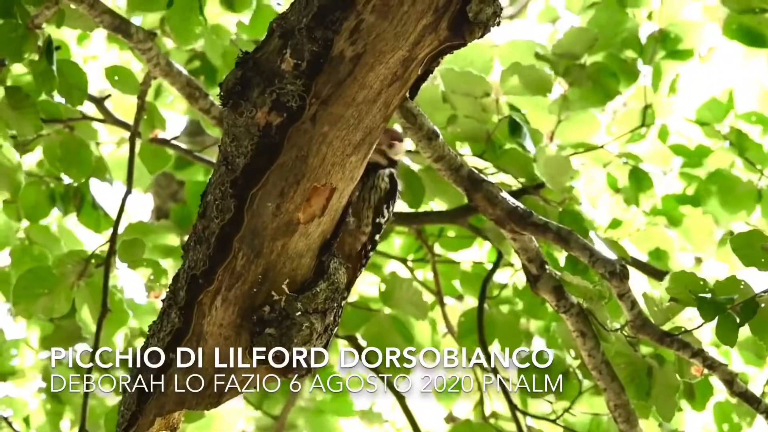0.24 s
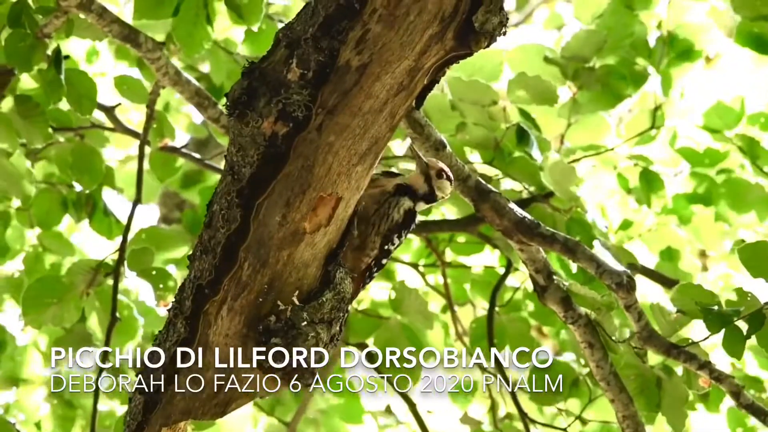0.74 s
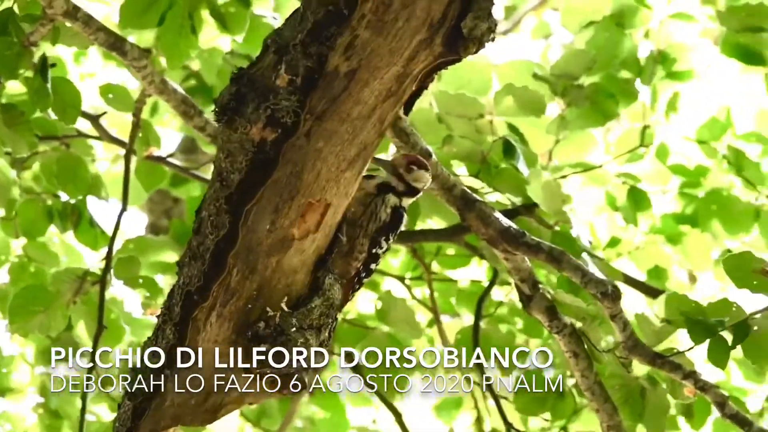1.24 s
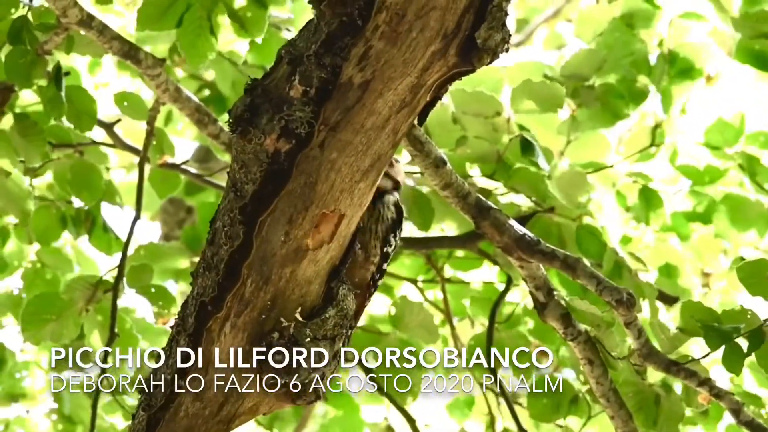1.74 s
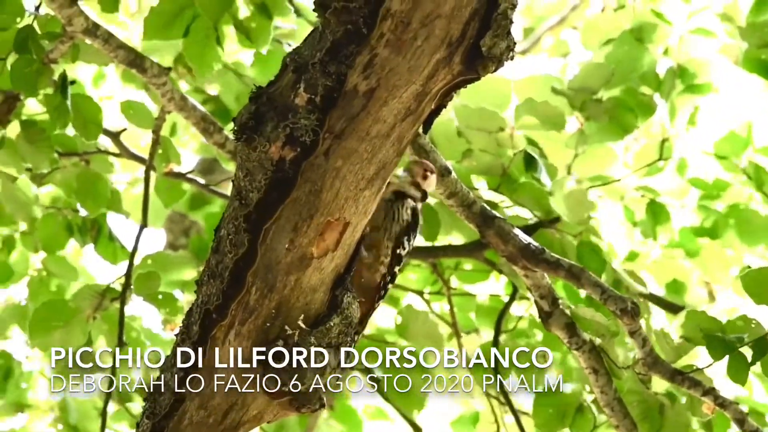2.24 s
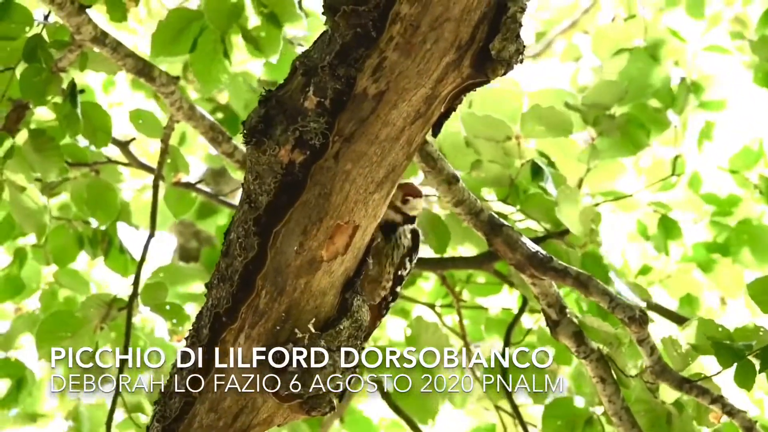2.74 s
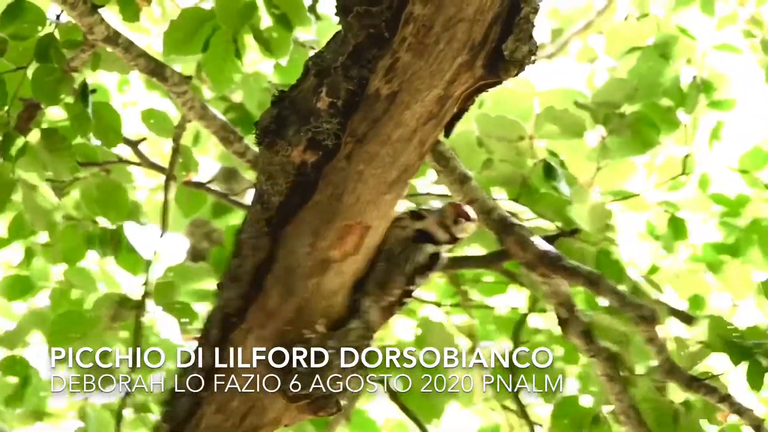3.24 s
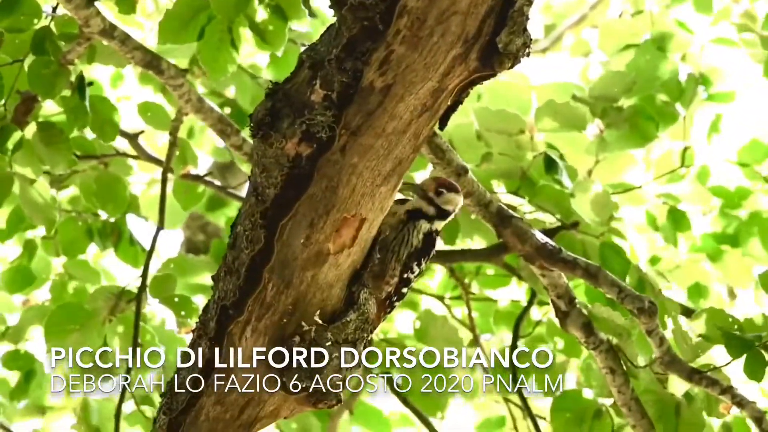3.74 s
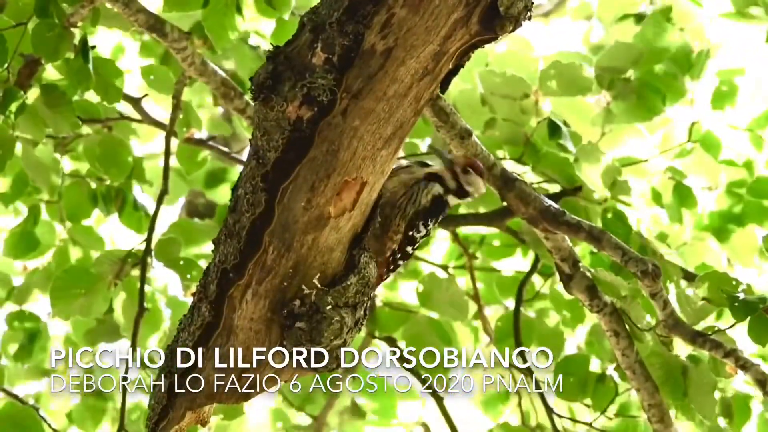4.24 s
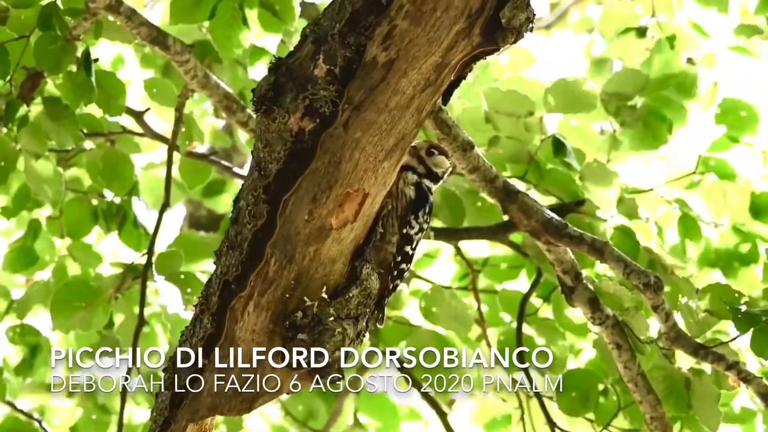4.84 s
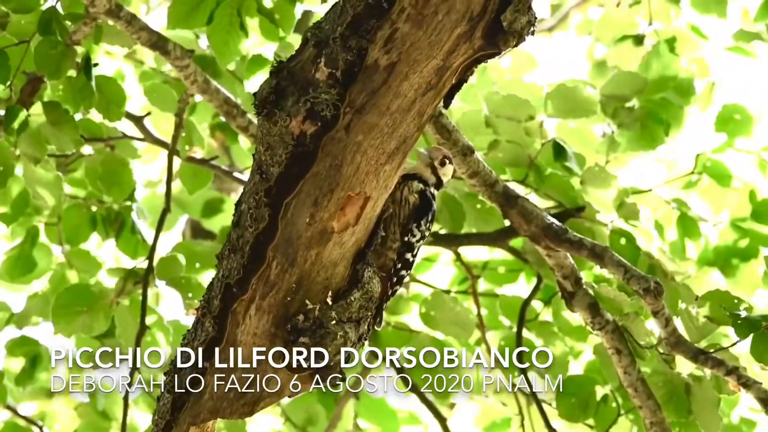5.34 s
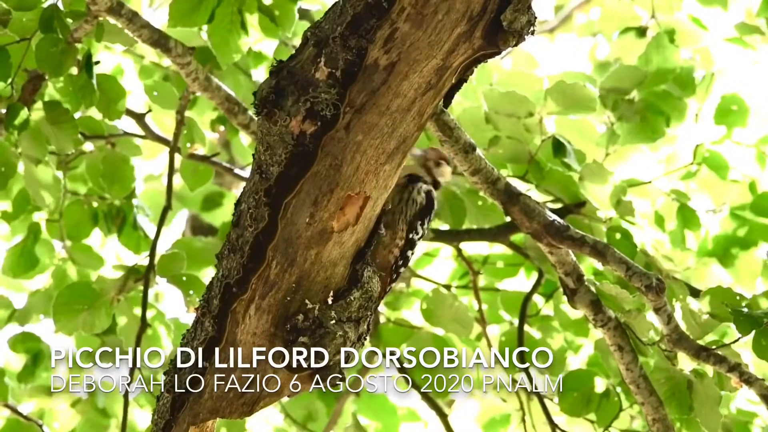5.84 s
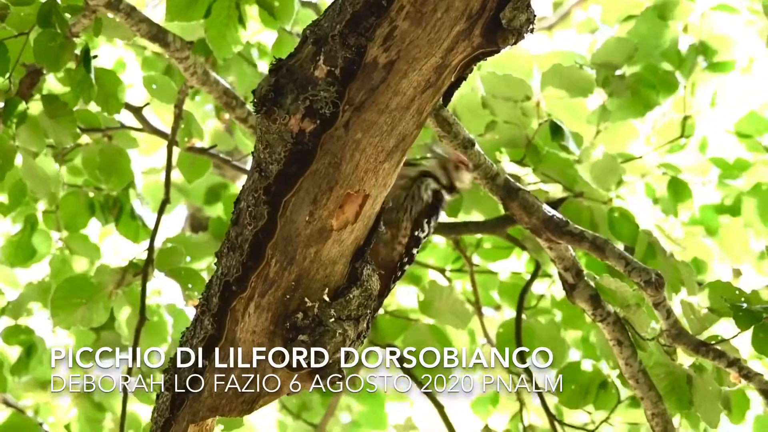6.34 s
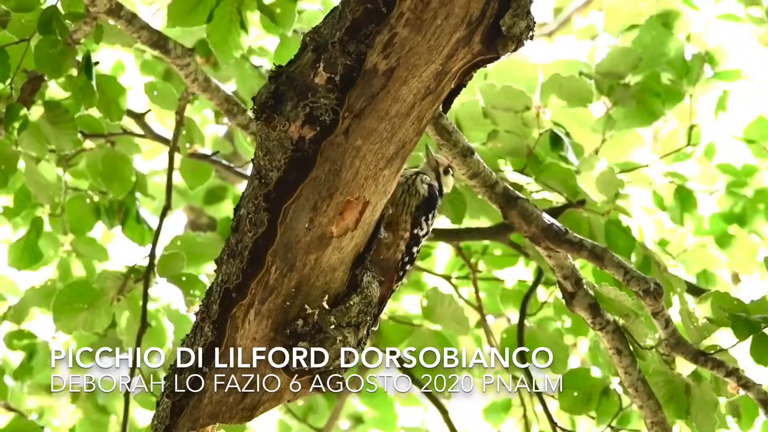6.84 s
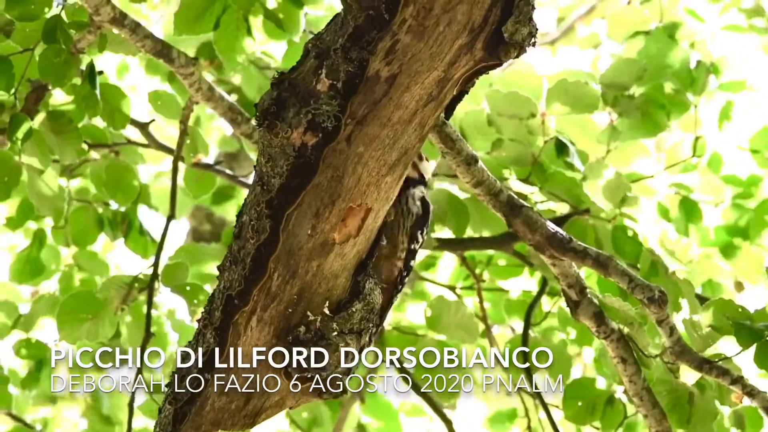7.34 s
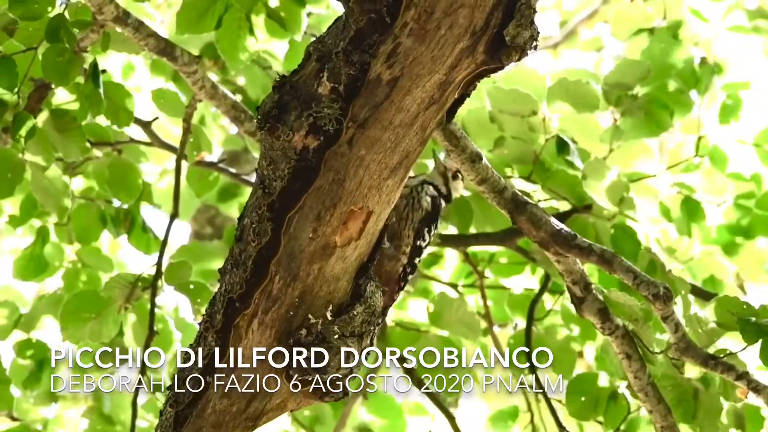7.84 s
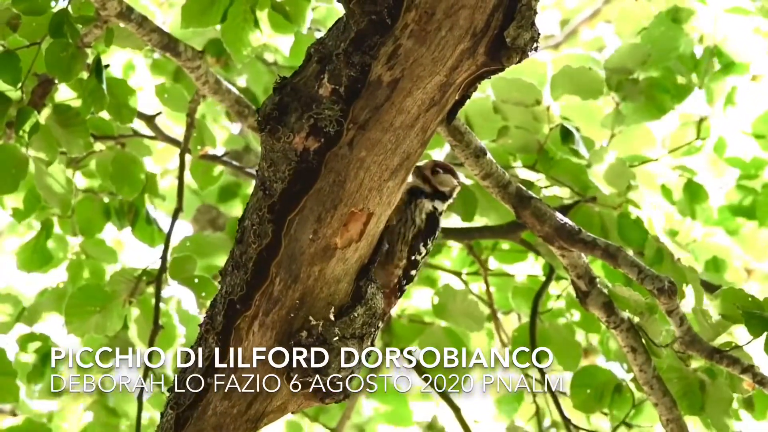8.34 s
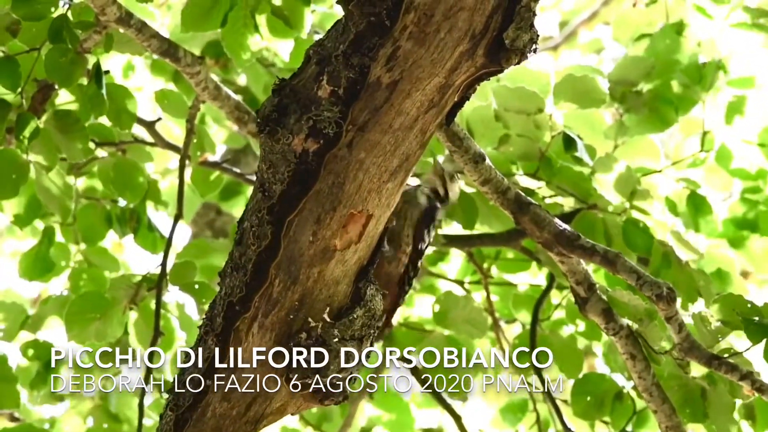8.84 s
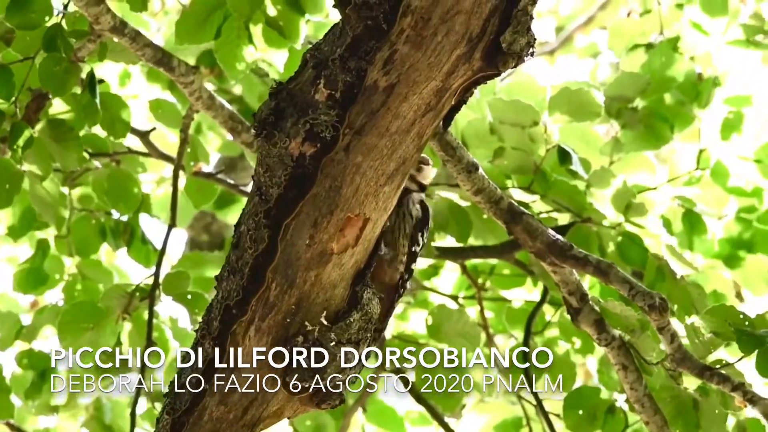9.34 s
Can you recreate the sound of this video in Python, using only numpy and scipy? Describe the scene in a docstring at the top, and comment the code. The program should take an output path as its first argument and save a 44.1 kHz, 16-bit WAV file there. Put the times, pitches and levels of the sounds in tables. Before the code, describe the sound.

A woodpecker pecks irregularly at dry wood among hushed leaves while nearby birds chip, low wind thumps the microphone and sharp camera-casing snaps jump out early.

```python
"""Woodpecker in a leafy wood, hand-held

A woodpecker taps a dead limb: each blow excites the resonances of core, wood and bark. A small bird
chips nearby in two gliding voices and another sings far off in slurred sines, both echoed by the trunks.
Close to the right microphone port the camera's plastic casing snaps in shell rings, amid soft gritty
filtered noise; a light breeze buffets each port in pressure dips, over leaf hush and hiss of shaped noise."""
import sys
import numpy as np
from scipy import signal
from scipy.fft import rfft, irfft, next_fast_len
from scipy.io import wavfile
from scipy.ndimage import uniform_filter1d, map_coordinates

SR = 44100
rng = np.random.default_rng(int(sys.argv[2]) if len(sys.argv) > 2 else 0)


def inscribe(sig):
    """Save sig as 16-bit PCM at rate SR to the path in sys.argv[1].

    A 1-D sig is mono; a 2-D sig holds one channel per row.
    Samples are clipped to [-1, 1] before scaling.
    """
    pcm = np.round(np.clip(np.atleast_2d(sig).T, -1, 1) * 32767)
    wavfile.write(sys.argv[1], SR, pcm.astype(np.int16))


N = 423360  # samples, 9.6 s
TOP_HZ = 15750  # band limit of the microphones' sound

# Noise of the microphones. Each row: frequency in Hz, relative density in dB per Hz.
HISS_SPECTRUM = [(200, -9), (8000, -7), (11000, 0.5), (16000, -1)]
# Far leaves and a faint low drone. Each row: frequency in Hz, relative density in dB per Hz.
LEAF_SPECTRUM = [(88, -60), (150, -4.5), (195, -3), (232, -0.5), (280, -4.5), (1340, -11.5), (2140, -13),
                 (3830, -17.5), (6220, -16.5), (7200, -20), (9360, -58.5), (15800, -120)]
LEAF_DB = -61.5
# Likeness of the leaves at the two ports. Each row: frequency in Hz, correlation from 0 to 1.
PORT_LIKENESS = [(150, 0.6), (400, 0.43), (1200, 0.062), (5000, .02)]

# Breeze at each port. Each row: time in seconds, left level in dB, right level in dB.
BREEZE_LEVELS = [(0, -53.5, -50.5), (0.9, -64.5, -44.5), (1.35, -47.5, -47), (1.8, -59, -48.5),
                 (2.3, -67, -57), (2.9, -63.5, -46), (3.65, -55, -58.5), (4.0, -60.5, -48.5),
                 (4.55, -62, -61), (5.0, -58, -50.5), (5.6, -48, -65), (6.15, -61, -62),
                 (6.7, -55.5, -63.5), (7.3, -49, -67.5), (7.9, -56, -66), (8.5, -52.5, -62),
                 (9.05, -60.5, -60), (9.6, -59, -64)]
# Strongest single eddies. Each row: time in seconds, depth of the dip left in dB, right in dB.
STRONG_EDDIES = [(0.163, -57, -36), (0.256, -61, -35), (0.379, -56, -41), (0.531, -63, -40),
                 (0.73, -62, -42), (0.8, -64, -41), (1.116, -60, -33), (1.234, -40, -45), (1.265, -51, -42),
                 (1.327, -38, -51), (1.359, -45.5, -36), (1.703, -47, -33), (2.495, -63, -37.5),
                 (2.715, -59, -30.5), (2.764, -53, -36), (3.127, -53, -36), (3.257, -60, -37),
                 (3.72, -39, -64), (3.878, -57.5, -37.5), (4.082, -62, -38.5), (4.81, -56, -38),
                 (5.088, -58, -34.5), (5.128, -61, -31), (5.204, -67, -42), (5.511, -35, -58),
                 (5.622, -37, -55.5), (5.783, -36.5, -64), (5.905, -61, -36.5), (6.22, -62, -44),
                 (6.293, -40, -53), (7.201, -33.5, -59), (7.356, -35.5, -53), (7.514, -39.5, -56.5),
                 (8.44, -52, -40), (8.466, -41, -53), (8.683, -40, -64), (9.133, -61, -32.5),
                 (9.437, -54, -40)]
# Eddies at a port. Each row: frequency in Hz, relative density in dB per Hz.
EDDY_SPECTRUM = [(12, -33), (25, -9.5), (45, 1.5), (75, 1), (110, -2.5), (160, -11), (260, -25),
                 (500, -56.5), (1000, -120)]
# Far low roar. Each row: frequency in Hz, relative density in dB per Hz.
ROAR_SPECTRUM = [(12, -22.5), (30, 0.5), (60, -1), (120, -17), (250, -18)]
EDDIES_PER_S, EDDY_SCATTER_DB = 70, 4
LULL_DB, LULL_POINTS_PER_S = 3, 12  # size and pace of the flow's stalls and returns

# Echoes among the trunks. Each row: frequency in Hz, time to die by 60 dB in seconds.
TRUNK_DECAY = [(300, .35), (1500, 0.29), (5000, 0.63), (9000, 0.34)]
# Far song. Each row: start in seconds, length in seconds, start pitch in Hz, end pitch in Hz, level in dB.
SONG_NOTES = [(0.342, 0.046, 7200, 6280, -72), (0.445, .012, 5700, 6500, -64.5),
              (.459, 0.012, 6400, 5500, -64), (0.503, 0.013, 4780, 5900, -64),
              (0.517, .015, 6300, 5450, -64.5), (0.568, 0.012, 5000, 5800, -68),
              (0.581, 0.012, 6300, 5450, -66), (.84, 0.11, 6550, 6450, -75), (0.992, 0.06, 6770, 6400, -73),
              (1.5, .04, 6600, 6400, -75), (1.545, 0.05, 6450, 6380, -77), (2.421, 0.034, 6310, 6370, -75),
              (2.769, .014, 6400, 5560, -63), (2.813, 0.014, 4950, 6100, -69),
              (2.828, .015, 6350, 5400, -64.5), (2.849, 0.014, 7090, 6590, -66),
              (2.896, 0.015, 6200, 5200, -63), (4.065, 0.11, 4490, 4760, -78),
              (4.437, .03, 6900, 6550, -63), (5.47, 0.023, 6400, 6100, -66.5),
              (5.858, 0.017, 7200, 6300, -63), (5.894, 0.054, 6440, 6310, -70),
              (7.282, 0.167, 6580, 6400, -75.5), (7.547, 0.0194, 7100, 6430, -64.5),
              (7.682, 0.055, 6240, 6120, -65), (7.765, 0.093, 6380, 6640, -71.5),
              (8.103, 0.088, 6420, 6230, -69.5), (8.22, 0.07, 6380, 6080, -73.5),
              (8.45, 0.076, 6380, 6350, -69), (8.582, 0.054, 6730, 6470, -70),
              (8.902, 0.0197, 7160, 6600, -63.5), (9.077, 0.089, 6340, 6130, -71)]

# Soft gritty noise on the casing; at 1.039 and 2.704 a faint rustle around the snaps. Each row: start
# in seconds, loudest moment in seconds, end in seconds, hum level in dB, scratch against the hum in dB.
GRITTY_SWELLS = [(.38, 0.49, 0.86, -61.5, -9), (0.89, 0.922, 1.09, -60, -0.5),
                 (1.039, 1.051, 1.18, -49, -7), (1.648, 1.717, 1.72, -56.5, -5),
                 (1.83, 1.867, 1.97, -58, -5), (1.94, 1.975, 2.24, -56.5, -6),
                 (2.558, 2.6, 2.69, -51.5, -10), (2.704, 2.721, 2.95, -51, -5.5),
                 (2.977, 3.077, 3.24, -45.5, -10.5), (3.9, 3.94, 4.7, -67, 1)]
# Hum of the gritty noise, passed twice. Each row: centre in Hz, width in Hz, gain per pass in dB.
GRIT_HUM = [(2070, 450, 0.5), (3060, 2800, -9.5)]
# Scratch of the gritty noise, passed twice. Each row: centre in Hz, width in Hz, gain per pass in dB.
GRIT_SCRATCH = [(4170, 6000, -5), (6300, 1500, 1)]

# Casing snaps. Each row: start in seconds, ring level in dB, ring pitch in Hz, then against the ring
# the bright, dull, fizz and thud levels in dB, and last the burst's time to die by 60 dB in seconds.
CASING_SNAPS = [(1.0523, -22.5, 2140, 9, -49, -20, -23, 0.0074),
                (1.0671, -4.5, 2035, -3.5, -59, -40, -36, 0.0029),
                (1.9862, -27, 2150, 8, -22, -35, -32, 0.014),
                (1.9961, -6.5, 2113, 2, -40.5, -56, -28.5, 0.01),
                (2.7415, -21, 2090, 11.5, -28.5, -4, -24, 0.0078),
                (2.7483, -5.5, 2116, 9, -35.5, -15, -31, 0.0061),
                (3.0958, -15.5, 2130, 2.4, -37, -25.5, -16.5, 0.012),
                (3.1011, -3, 2063, 3, -27, -16.5, -31, 0.0073),
                (3.9007, -39, 2070, -9, -40.5, -24, -7, 0.0043),
                (3.9118, -19.5, 2050, -8.5, -28, -24, -15.5, 0.0074),
                (3.9533, -17, 1960, -8.5, -7.5, -26, -28, 0.0077)]
# Bright seam. Each row: centre in Hz, width in Hz, gain in dB.
SEAM_MODES = [(2570, 1200, 2), (4180, 2300, 2.5), (5920, 1620, 2.5)]
# Dull grip, passed twice. Each row: centre in Hz, width in Hz, gain per pass in dB.
GRIP_MODES = [(1164, 260, 0)]
# Fizz of the casing, passed twice. Each row: centre in Hz, width in Hz, gain per pass in dB.
FIZZ_MODES = [(7960, 900, 0), (11370, 1800, 0.0049)]
# Camera body, passed twice. Each row: centre in Hz, width in Hz, gain per pass in dB.
BODY_MODES = [(232, 160, -1), (620, 390, -2)]
# Casing sound at the farther, left port. Each row: frequency in Hz, gain in dB.
LEFT_PORT_SHADOW = [(250, -8), (1000, -11), (2100, -23), (3000, -20.5), (4700, -11.5), (6500, -17.5),
                    (10000, -4)]

# Chip calls. Each row: start in seconds, call level in dB, extra level of the falling voice in dB.
CHIP_CALLS = [(4.262, -38, -2), (4.4261, -38, -2), (4.5598, -34.5, -5.5), (4.7528, -36, -3.5),
              (4.8651, -38.5, -3), (5.0267, -35, -10), (5.3152, -40, -2), (8.3637, -36, -9),
              (8.6566, -38, -2.5), (9.2317, -37.5, -2.5), (9.4169, -36, -5.5)]
# Rising voice before each call's pitch shift. Each row: seconds after start, pitch in Hz, level in dB.
RISING_VOICE = [(0, 4395, -27), (.003, 4605, -16), (.008, 5106, -1.5), (.013, 5400, -8), (.018, 5530, -39)]
# Falling voice before each call's pitch shift. Each row: seconds after start, pitch in Hz, level in dB.
FALLING_VOICE = [(.002, 7220, -40), (.004, 6620, -7), (.007, 5948, -17), (.011, 5283, -0.5),
                 (.015, 4870, -2), (.02, 4200, -9), (.026, 3570, -11.5), (.029, 3200, -45)]

# Beak blows. Each row: start in seconds, level of the wood in dB, hollow thump and bark crack
# against the wood in dB.
BEAK_BLOWS = [(0.069, -33.5, -5, -14.5), (0.397, -34.5, -10, -4), (1.674, -39, -0.5, -6.5),
              (2.103, -33.5, -14, -6.5), (2.541, -46.5, -24.5, -3), (2.716, -37, -6, -2.5),
              (2.923, -42, -5.5, -10.5), (4.335, -50, -23, -5.5), (4.534, -51.5, 0, -11.5),
              (4.705, -53, -9, -7.5), (5.719, -40.5, -2, 0), (5.979, -39, -10, -7.5),
              (6.216, -45.5, -8, -10), (6.451, -50.5, -2.5, -4), (6.945, -36, -2.5, -2),
              (7.244, -29.5, -16, -8.5), (7.695, -39, -3.5, -4.5), (7.922, -50.5, -28, -9.5),
              (8.639, -38.5, -4, -1.5), (8.885, -34.5, -7, -9.5), (8.966, -54.5, -16, -14),
              (9.231, -40.5, -31, -4), (9.501, -47, -17, -11.5)]
# Hollow core of the limb. Each row: centre in Hz, width in Hz, gain in dB.
CORE_MODES = [(240, 120, -2), (306, 80, -0.5), (454, 46, 5.5), (638, 110, -5.5)]
# Wood of the limb. Each row: centre in Hz, width in Hz, gain in dB.
WOOD_MODES = [(848, 210, -0.5), (1157, 130, 4.5), (1447, 170, 2), (1720, 240, -2), (2060, 230, -3.5),
              (2592, 410, -7)]
# Bark of the limb. Each row: centre in Hz, width in Hz, gain in dB.
BARK_MODES = [(2600, 1100, -4), (4000, 1800, -4), (5800, 2500, -4)]
CRUNCH_T60_S = .031  # crushed fibres die away


def amp(db):
    """dB to gain."""
    return 10 ** (np.asarray(db) / 20)


def unit(x):
    """Each row at rms 1."""
    return x / np.sqrt(np.mean(x ** 2, axis=-1, keepdims=True) + 1e-20)


def noise(*shape):
    """White noise, or single normal draws."""
    return rng.standard_normal(shape)


def along(points, hz):
    """Values between (Hz, value) points on a log axis."""
    f, v = np.transpose(points)
    return np.interp(np.log(hz + 1), np.log(f + 1), v)


def filtered(x, response):
    """x times a complex response of frequency."""
    m = next_fast_len(N + SR // 2)
    return irfft(rfft(x, m) * response(np.fft.rfftfreq(m, 1 / SR)), m)[..., :N]


def add(track, s, sound):
    """Mix a sound into a track at time s."""
    part = track[..., round(s * SR):][..., :sound.shape[-1]]
    part += sound[..., :part.shape[-1]]


def resonant(hz, modes):
    """Causal response of (Hz, width, dB) resonances, alternating in sign."""
    total = 0
    for k, (centre, width, db) in enumerate(modes):
        damping = 1j * hz * width
        total = total + (-1) ** k * amp(db) * damping / (centre ** 2 - hz ** 2 + damping)
    return total


def struck(force, response):
    """A short force through a body's response, scaled to peak 1 and faded out."""
    sound = irfft(rfft(force) * response, len(force))[:len(force) // 2]
    fade = np.hanning(len(force))[len(sound):]
    return sound * fade / np.max(np.abs(sound))


def whistle(points):
    """A sine that follows (s, Hz, dB) points."""
    s, hz, db = np.transpose(points)
    t = np.arange(int(s[-1] * SR)) / SR
    phase = 2 * np.pi * np.cumsum(np.interp(t, s, hz)) / SR
    return amp(np.interp(t, s, db)) * np.sin(phase)


def arriving(x, left_db, lag_s):
    """A source to the right reaches the left port later, at left_db (a number or a curve per Hz)."""
    def ports(hz):
        level_db = left_db(hz) if callable(left_db) else left_db
        return [amp(level_db) * np.exp(-2j * np.pi * hz * lag_s), 1 + 0 * hz]
    return filtered(x, ports)


def among_trunks(sound, wet_db, gap_s):
    """A fresh stereo echo tail for one short sound, each frequency dying at its own speed."""
    hz, t, z = signal.stft(noise(2, SR // 2), SR, nperseg=256)
    trunks_db = 1.5 * noise(len(t))  # single trunks answer louder than the gaps
    decay_db = -60 * t / along(TRUNK_DECAY, hz)[:, None]
    tail = signal.istft(z * amp(trunks_db + decay_db), SR, nperseg=256)[1]
    tail *= 1 - np.exp(-np.arange(tail.shape[1]) / SR / gap_s)  # the nearest trunks answer late
    return amp(wet_db) * signal.fftconvolve(sound[None], tail / np.linalg.norm(tail[0]), axes=1)


def hiss():
    """The microphones' own noise: shaped white noise, separate at each port."""
    return amp(-72) * unit(filtered(noise(2, N), lambda hz: amp(along(HISS_SPECTRUM, hz))))


def hush():
    """Steady rustle of far leaves, faintly patchy, more alike at both ports in the bass."""
    z = signal.stft(noise(2, N), nperseg=512)[2]
    patches = uniform_filter1d(noise(*z.shape[1:]), size=8, axis=0)  # over frequency
    patches = uniform_filter1d(patches, size=20, axis=1)  # over time
    pair = signal.istft(z * amp(0.8 * patches / patches.std()), nperseg=512)[1][:, :N]

    def mid_side(hz):
        # the angle that mixes mid and side to the wanted likeness
        turn = np.arccos(np.clip(along(PORT_LIKENESS, hz), -1, 1)) / 2
        colour = amp(along(LEAF_SPECTRUM, hz)) / (1 + (hz / 7200) ** 40)
        return colour * [np.cos(turn), np.sin(turn)]

    mid, side = filtered(pair, mid_side)
    return amp(LEAF_DB) * unit(np.array([mid + side, mid - side]))


def breeze():
    """Eddies pass the ports as short pressure dips in a fitful flow, over a steady far roar."""
    s, *levels_db = np.transpose(BREEZE_LEVELS)
    t = np.arange(N) / SR
    lulls = np.array([map_coordinates(k, [t * LULL_POINTS_PER_S]) for k in noise(2, 400)])
    flow = amp([np.interp(t, s, db) for db in levels_db]) * unit(amp(LULL_DB * lulls))

    def eddy_shape(hz):
        return amp(along(EDDY_SPECTRUM, hz))

    passing = rng.random((2, N)) < EDDIES_PER_S / SR
    eddies = passing * amp(EDDY_SCATTER_DB * noise(2, N))
    dips = flow * unit(filtered(.5 * noise(2, N) - unit(eddies), eddy_shape))
    strong = np.zeros((2, N))
    for at, *depth_db in STRONG_EDDIES:
        strong[:, round(at * SR)] = -amp(depth_db)
    # dividing by the mean makes each dip as deep as its row says
    dips += filtered(strong, lambda hz: eddy_shape(hz) / eddy_shape(hz).mean())

    air = noise(3, N)
    shared = air[:2] + 0.7 * air[2]  # partly alike at both ports
    roar = unit(filtered(shared, lambda hz: amp(along(ROAR_SPECTRUM, hz)) * (hz < 400)))
    return dips + amp(-69) * roar


def far_song():
    """Thin slurred notes that waver in the moving air, as much echo as voice."""
    out = np.zeros((2, N))
    share = np.array([0, .2, .8, 1])  # of the note's length
    swell_db = np.array([-10.5, 0.5, 0.5, -10])
    for s, length, start_hz, end_hz, db in SONG_NOTES:
        pitch = start_hz + share * (end_hz - start_hz)
        note = whistle(np.transpose([share * length, pitch, db + swell_db]))
        note = note * amp(3.9 * unit(uniform_filter1d(noise(len(note)), size=120)))
        add(out, s, note[None])
        add(out, s, among_trunks(note, wet_db=-1.5, gap_s=0.0027))
    return out


def casing_grit():
    """Soft gritty noise that swells and fades: one grain of noise filtered to a hum and a scratch."""
    t = np.arange(N) / SR
    grit = noise(N) * amp(3.5 * unit(uniform_filter1d(noise(N), size=40)))
    hum = unit(filtered(grit, lambda hz: resonant(hz, GRIT_HUM) ** 2))
    scratch = unit(filtered(grit, lambda hz: resonant(hz, GRIT_SCRATCH) ** 2))
    out = np.zeros(N)
    for start, loudest, end, db, scratch_db in GRITTY_SWELLS:
        part = slice(round(start * SR), round(end * SR))
        swell = np.interp(t[part], [start, loudest, end], [0, 1, 0]) ** 2
        out[part] += amp(db) * swell * (hum[part] + amp(scratch_db) * scratch[part])
    return arriving(out, left_db=-21.0, lag_s=.0002)


def casing_snaps():
    """A plastic seam lets go in a burst of slips: one shell ring under a broad crack, then a faint rattle."""
    out, t = np.zeros(N), np.arange(8192) / SR
    hz = np.fft.rfftfreq(len(t), 1 / SR)
    soft = (7000 ** 2 / (7000 ** 2 - hz ** 2 + 1j * hz * 7000)) ** 3  # plastic damps the treble
    small = (1j * hz / 1200 / (1 + 1j * hz / 1200)) ** 2  # a small shell sends out little bass
    for s, db, ring_hz, bright_db, dull_db, fizz_db, thud_db, t60 in CASING_SNAPS:
        burst = noise(len(t)) * amp(-60 * t / t60) * (1 - np.exp(-t / 0.00055))
        rattle = noise(len(t)) * amp(-35.5 - 60 * t / 0.062)
        kick = 0.39 * burst + rattle
        # a hard slip just after the softer onset
        kick[8] -= 1.5
        burst[8] -= 2.5
        # the faint narrow mode sings on
        shell_modes = [(ring_hz, 220, 0), (1.27 * ring_hz, 350, -9), (1.02 * ring_hz, 40, -20)]
        shell = resonant(hz, shell_modes) * resonant(hz, [(1.07 * ring_hz, 1500, 0)])
        snap = struck(kick, shell * soft * small)
        snap += amp(bright_db) * struck(burst, resonant(hz, SEAM_MODES) * soft * small)
        snap += amp(dull_db) * struck(kick, resonant(hz, GRIP_MODES) ** 2)
        snap += amp(fizz_db) * struck(burst, resonant(hz, FIZZ_MODES) ** 2)
        snap += amp(thud_db) * struck(kick, resonant(hz, BODY_MODES) ** 2)
        add(out, s, amp(db) * snap)
    return arriving(out, left_db=lambda f: along(LEFT_PORT_SHADOW, f), lag_s=.0002)


def chips():
    """A hoarse two-voiced call, varying a little, smeared by close leaves and echoed by the wood."""
    near, far, t = np.zeros(N), np.zeros((2, N)), np.arange(SR // 30) / SR
    for s, db, fall_db in CHIP_CALLS:
        pitch = 1 + .01 * rng.standard_normal()
        rise = whistle(np.multiply(RISING_VOICE, [1, pitch, 1]))
        # a weak tone an octave down
        rise = rise + amp(-12.5) * whistle(np.multiply(RISING_VOICE, [1, pitch / 2, 1]))
        fall = amp(fall_db) * whistle(np.multiply(FALLING_VOICE, [1, pitch, 1]))
        rise = np.pad(rise, (0, len(fall)))[:len(fall)]
        hoarse = amp(db + 1.8 * unit(uniform_filter1d(noise(len(fall)), size=20)))
        call = hoarse * (rise + fall)
        leaves = noise(len(t)) * amp(-60 * t / 0.073)
        add(near, s, call)
        add(near, s, amp(-5) * signal.fftconvolve(call, leaves / np.linalg.norm(leaves)))
        # moving leaves blur the echoed pitch
        flutter = unit(.4 + unit(np.convolve(noise(len(fall)), np.hanning(70), "same")))
        to_trunks = hoarse * flutter * (1.46 * rise + 0.84 * fall)
        add(far, s, among_trunks(to_trunks, wet_db=-8.5, gap_s=0.0063))
    return arriving(near, left_db=-4.5, lag_s=.00018) + far * amp([[-1.5], [1.5]])


def woodpecker():
    """Each blow is a hard push and a crunch of crushed fibres, heard through core, wood and bark."""
    near, far, t = np.zeros(N), np.zeros((2, N)), np.arange(8192) / SR
    hz = np.fft.rfftfreq(len(t), 1 / SR)
    # each part loses treble above its own corner
    wood = resonant(hz, WOOD_MODES) / (1 + 1j * hz / 4000) ** 3
    core = resonant(hz, CORE_MODES) / (1 + 1j * hz / 1500) ** 2
    bark = resonant(hz, BARK_MODES) / (1 + 1j * hz / 8000) ** 4
    for s, db, thump_db, crack_db in BEAK_BLOWS:
        force = .12 * noise(len(t)) * amp(-60 * t / CRUNCH_T60_S)
        force *= 1 - np.exp(-t / 0.00043)
        force[:3] = -0.24  # the beak is blunt
        blow = amp(db) * struck(force, wood)
        blow += amp(db + thump_db) * struck(force, core)
        blow += amp(db + crack_db) * struck(force, bark)
        add(near, s, blow)
        add(far, s, among_trunks(blow, wet_db=-3, gap_s=0.0024))
    return arriving(near, left_db=0.0, lag_s=.00003) + far


def scene():
    """Air and leaves, the far bird, the casing at the port, then the near birds."""
    background = hiss() + hush() + breeze() + far_song()
    return background + casing_grit() + casing_snaps() + chips() + woodpecker()


def record(dry):
    """The loudest snaps bend against full scale; nothing is kept above the band limit."""
    bent = dry / (1 + np.abs(dry / 1.05) ** 5) ** (1 / 5)
    return filtered(bent, lambda hz: hz < TOP_HZ)


dry = scene()
out = record(dry)
inscribe(out)
```